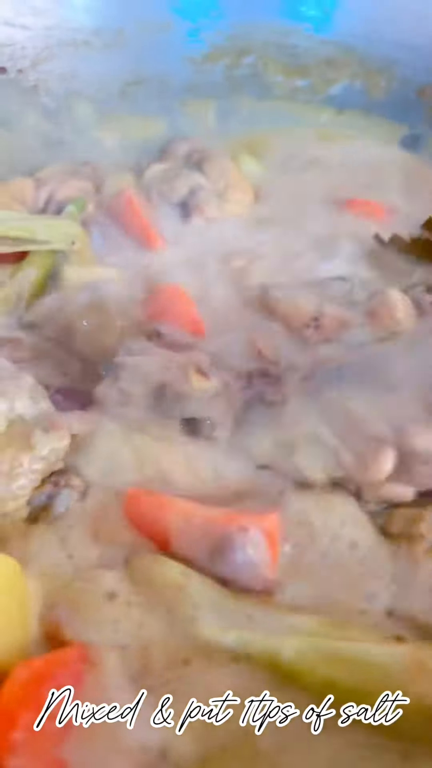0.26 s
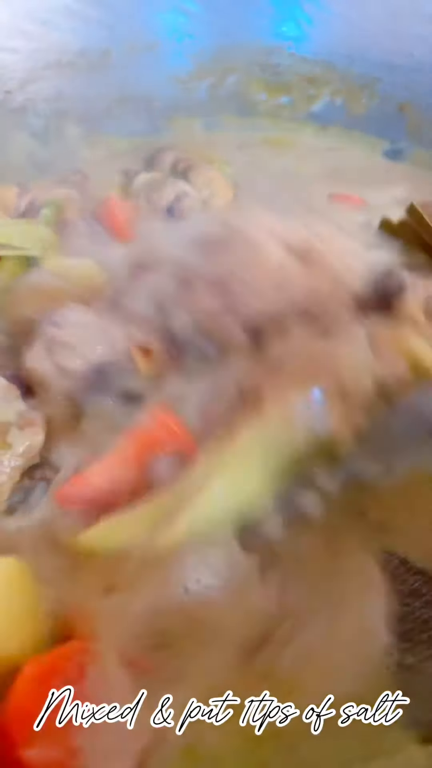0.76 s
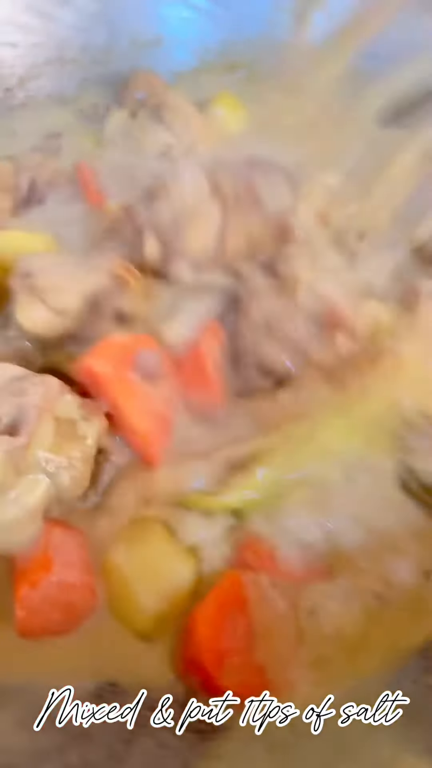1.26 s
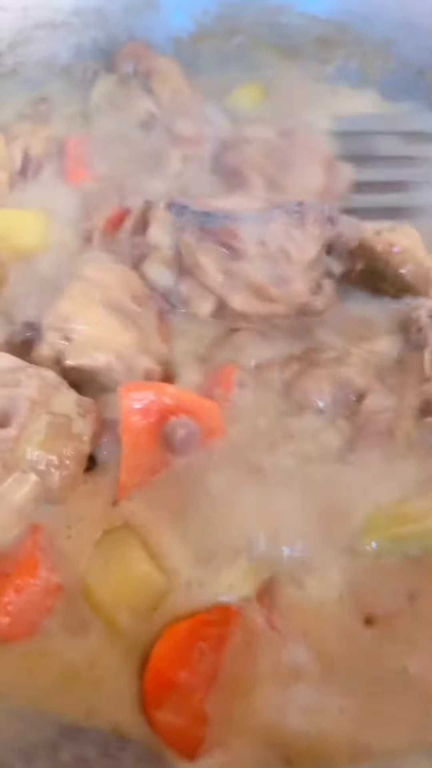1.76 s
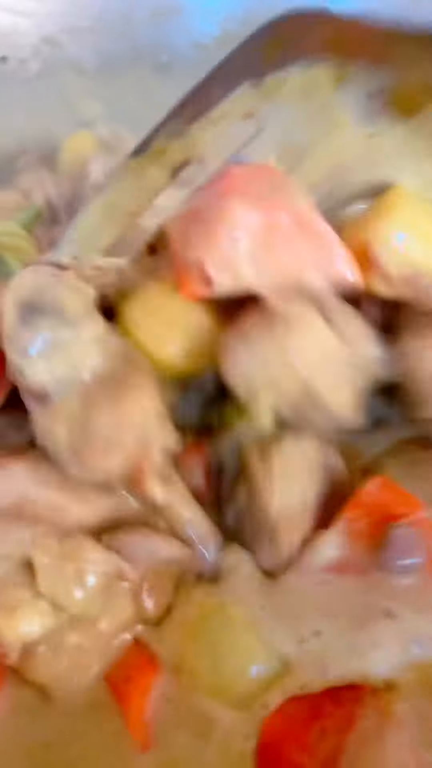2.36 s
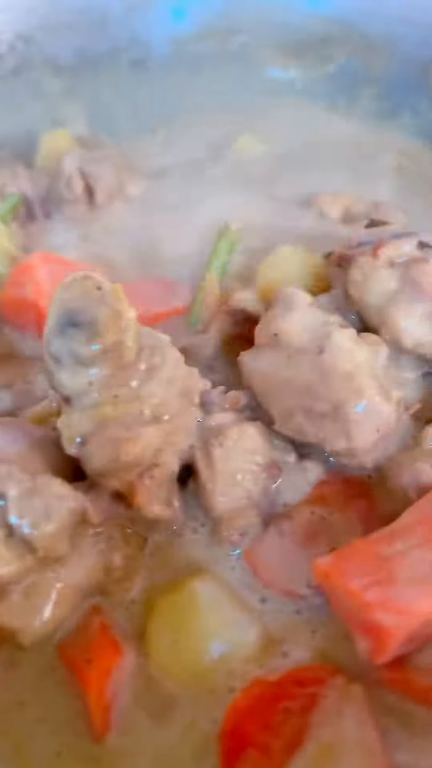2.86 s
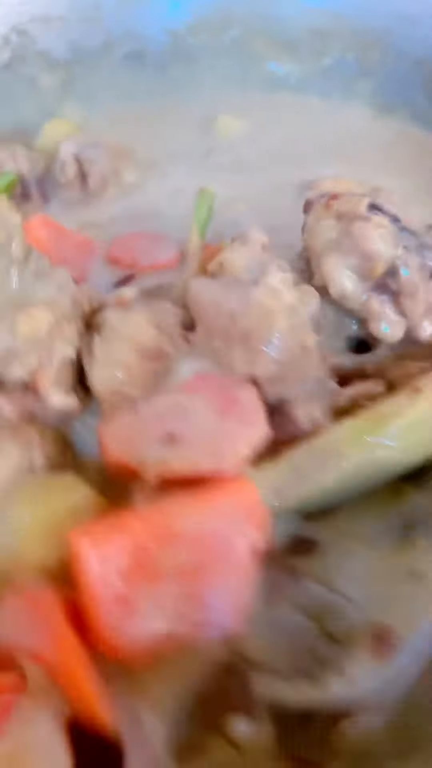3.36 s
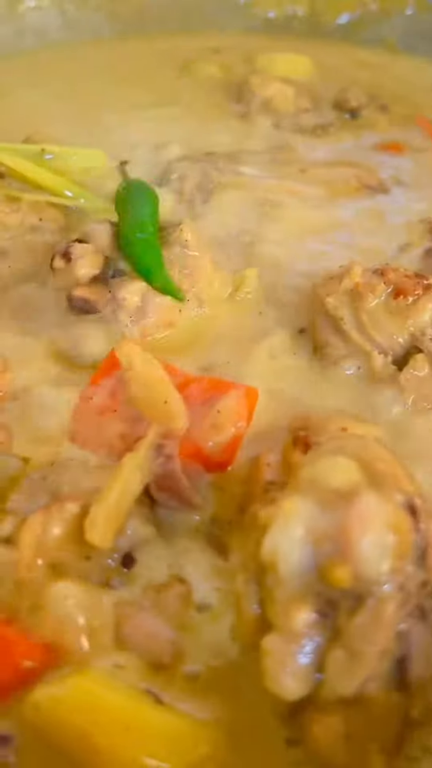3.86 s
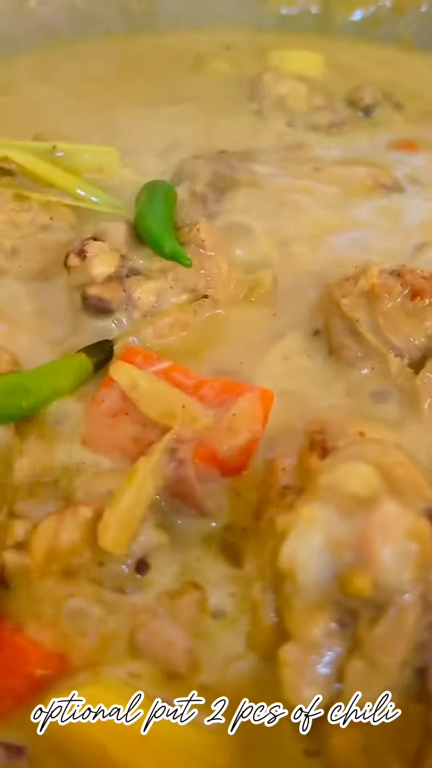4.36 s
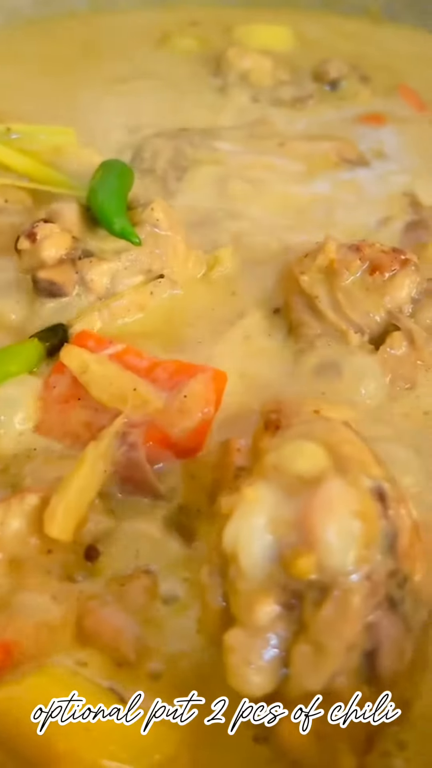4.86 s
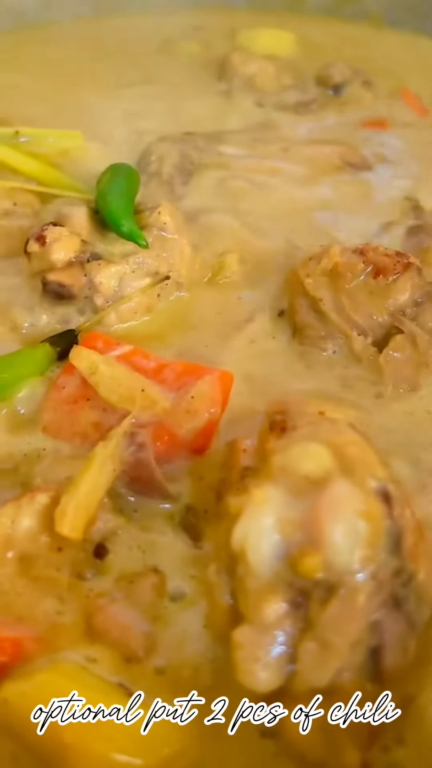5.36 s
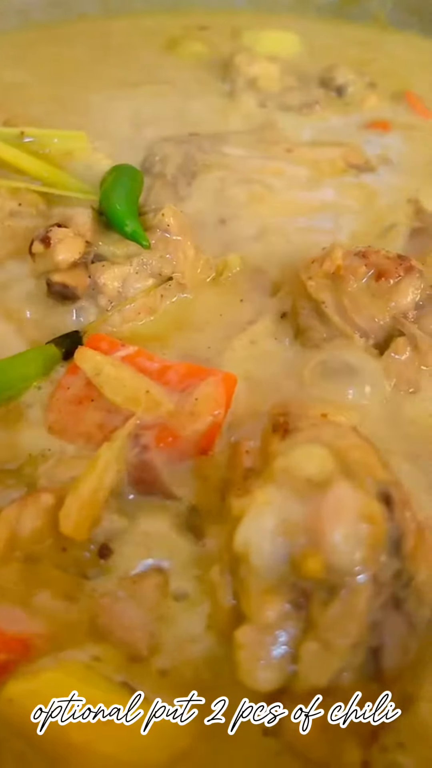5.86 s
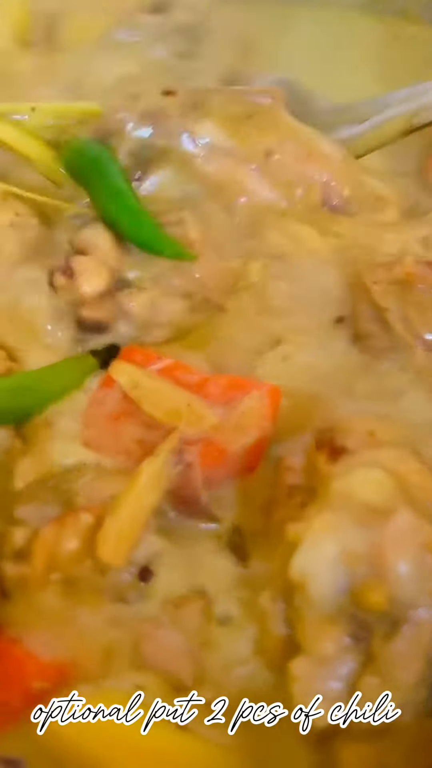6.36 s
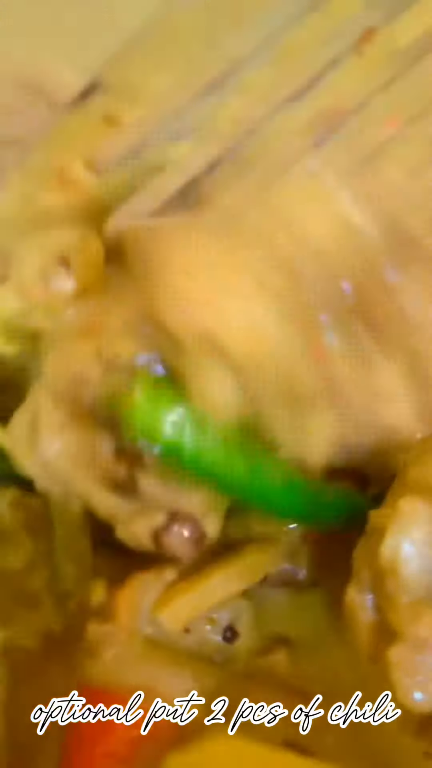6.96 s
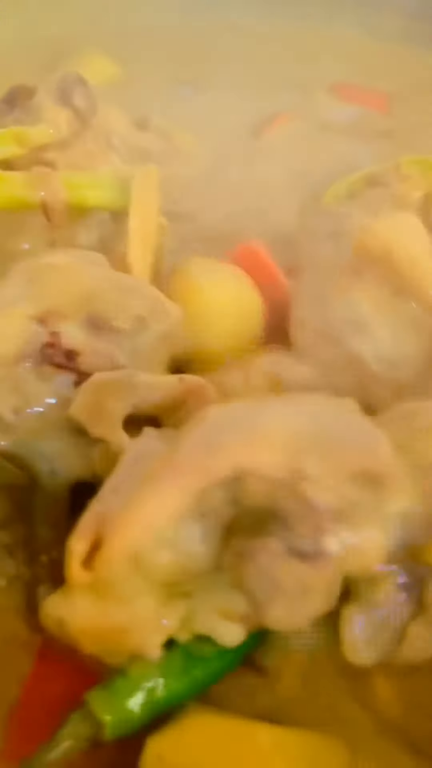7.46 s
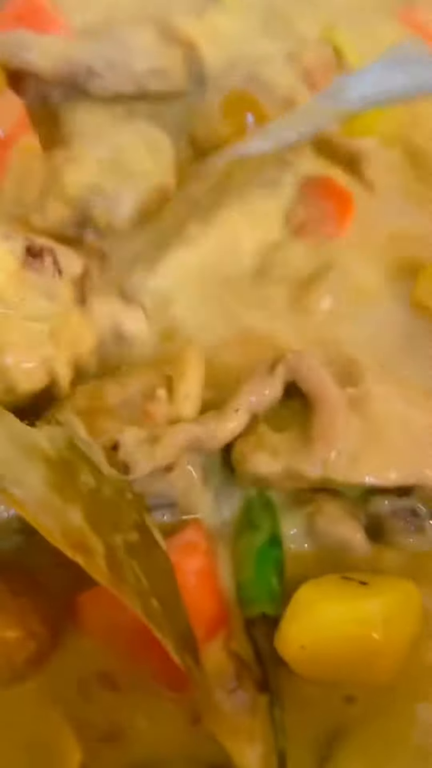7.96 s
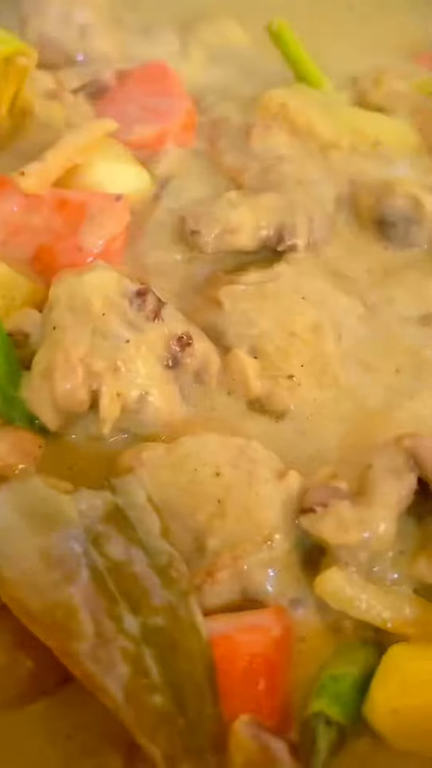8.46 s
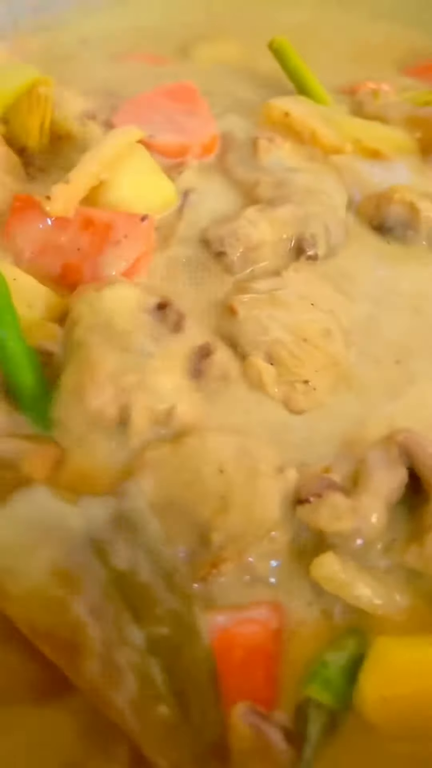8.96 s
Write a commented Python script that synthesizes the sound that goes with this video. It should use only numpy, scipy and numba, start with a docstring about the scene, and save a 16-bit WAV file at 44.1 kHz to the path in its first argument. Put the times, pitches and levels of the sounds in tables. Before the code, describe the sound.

Close to the microphone, thick sauce simmers in a metal pot in a small, reflective kitchen. A slotted steel spatula knocks and judders along the pot early on, with harder single blows afterwards. A dry click and a wet squelch lead into a brighter stretch of mostly popping bubbles. Then the spatula returns, loud bubbles burst, and knocks and scrapes continue to the end over a low hum.

```python
"""Thick curry simmers in a metal pot in a small hard-walled kitchen, close to the microphone.
From 0.5 s a slotted steel spatula knocks and judders along the pot; single blows follow at 1.5 and 2.8 s.
A dry click at 3.3 s and a squelch lead, as the treble opens at 3.7 s, into a stretch mostly of popping bubbles.
The spatula returns at 6 s, louder bubbles burst near 7 s, and knocks and scrapes fill the rest.
Throughout, bubbles burst as short rising tones over noise sizzle and a low drone of hum, mains and rumble."""
import sys
import numpy as np
from scipy import signal
from scipy.fft import rfft, irfft
from scipy.io import wavfile
from scipy.ndimage import uniform_filter1d, map_coordinates
from numba import njit

SR = 44100
rng = np.random.default_rng(int(sys.argv[2]) if len(sys.argv) > 2 else 0)


def store_pcm(level_fs):
    """Save levels as 16-bit WAV."""
    pcm = np.round(np.clip(level_fs, -1, 1) * 32767).astype(np.int16)
    wavfile.write(sys.argv[1], SR, np.atleast_2d(pcm).T)


N = 405719
TIME = np.arange(N) / SR
RING_TIME = TIME[:SR // 4]

# low hum of the kitchen: (time [s], relative level [dB])
HUM_LEVEL = [(0.3, -43), (1.7, -42.5), (2.8, -37.5), (3.8, -46), (5.5, -43), (7.8, -44.5), (8.8, -39.5)]
# spectrum of the kitchen rumble: (frequency [Hz], gain [dB])
RUMBLE_COLOUR = [(20, -11.5), (34, -12.5), (45, -4.5), (70, 3), (102, 1), (135, -3.5), (200, -13.5),
                 (260, -14.5), (360, -11), (500, -24), (900, -24.5), (3000, -86.5)]
# spectrum of the pot's shudder on the stove: (frequency [Hz], gain [dB])
SHUDDER_COLOUR = [(30, -23), (70, 5), (110, 8), (170, -13.5), (280, -11), (450, -20.5), (1500, -64)]
# simmering sauce: (time [s], relative level [dB])
SIMMER_LEVEL = [(0.25, -53), (1.35, -54), (2.45, -52), (3.65, -51.5), (3.85, -57.5), (4.5, -56.5),
                (5.6, -54), (6.8, -53.5), (8.5, -60.5)]
# spectrum of the sizzle: (frequency [Hz], gain [dB])
SIZZLE_COLOUR = [(300, -2.5), (600, -24), (1000, 3.5), (2500, -1.5), (4500, -10), (7000, -9.5), (9000, -19),
                 (11500, -26), (15500, -17)]
# spectrum of all bubbles: (frequency [Hz], gain [dB])
BUBBLE_COLOUR = [(700, -1.5), (1500, -4.5), (3500, -4.5), (7000, -4.5), (9000, -5.5), (12000, -30)]
# three sizes of bubble: (bursts [per s], middle pitch [Hz], pitch spread [octaves],
# relative level [dB], middle length of ring [cycles])
BUBBLE_SIZES = [(55, 1150, 0.42, -3.5, 11), (59.7, 2800, 0.5, -1.5, 16), (16, 6700, 0.2, -0.5, 20)]
# a burst sets off its neighbours: (mean gap [s], change per step [dB])
FOLLOWERS = (0.013, -5)
# squelches in the sauce: (start [s], length [s], relative level [dB], middle pitch [Hz])
SQUELCHES = [(3.46, 0.42, -65, 4400), (6.895, 0.079, -71, 2360), (6.98, 0.22, -59.5, 1590)]
# loud bubble pops and one dry click: (time [s], relative level [dB], starting pitch [Hz],
# length of ring [cycles], snap [dB])
POPS = [(0.087, -41, 5070, 20, -3), (0.239, -42, 3560, 16, -11), (0.303, -36, 2850, 18, -14),
        (0.404, -38, 880, 14, -25), (1.135, -33, 4970, 22, -15), (1.205, -29, 3700, 11, -7),
        (1.237, -37, 5160, 10, -7), (1.314, -37, 6300, 16, -2), (2.161, -18, 3400, 12, -7.5),
        (2.300, -30, 2800, 24, -14), (2.329, -36, 5700, 18, -8), (2.574, -39.5, 6500, 14, 0),
        (2.709, -30, 8500, 28, -14), (3.312, -16, 3210, 3, -6), (3.514, -38.5, 5300, 24, -20),
        (3.666, -35, 4220, 26, -11), (3.748, -40, 5150, 22, -6), (3.778, -42, 6300, 20, -10),
        (3.802, -43, 6950, 18, -8), (3.964, -43, 6400, 18, -6), (4.020, -46, 3750, 14, -9),
        (4.038, -36, 3500, 20, -7), (4.069, -38, 845, 22, -32), (4.092, -44, 3680, 17, -5),
        (4.171, -46, 780, 17, -27), (4.213, -35, 2720, 23, -15), (4.305, -41, 5240, 18, -2),
        (4.372, -41, 3950, 17, -8), (4.555, -39, 2750, 18, -9), (4.593, -41, 4350, 18, -11),
        (4.621, -45, 7200, 22, -9), (4.633, -42, 1520, 23, -16), (4.812, -38, 1450, 26, -27),
        (4.827, -42, 4550, 18, -7), (5.063, -40, 7000, 18, -7), (5.072, -38, 990, 18, -16),
        (5.098, -40, 3930, 19, -12), (5.388, -37, 8100, 26, -14), (5.457, -39, 3970, 12, -17),
        (5.504, -37, 3400, 20, -22), (5.553, -51, 2230, 15, -12), (5.591, -45, 7600, 20, -8),
        (5.729, -36, 3300, 20, -12), (5.792, -40, 3750, 16, -12), (5.846, -36.5, 1900, 30, -20),
        (5.934, -46, 6760, 14, 0), (6.007, -34, 3630, 8.9, -6), (6.517, -38, 900, 18, -22),
        (6.619, -36, 3000, 14, -10), (6.658, -35, 7100, 12, -3), (6.678, -38, 890, 18, -29),
        (6.725, -35, 3480, 22, -16), (6.764, -33, 2810, 16, -6), (6.889, -26, 2300, 29, -19),
        (6.926, -27, 2470, 27, -5.5), (6.981, -39, 1140, 24, -27), (7.013, -31.5, 6360, 13, -3.5),
        (7.165, -41, 1000, 19, -19), (7.222, -35.5, 7850, 22, -17), (8.599, -35, 7000, 39, -13)]
# ring shared by pot and spatula: (frequency [Hz], relative level [dB], t60 [s])
POT_MODES = [(248.4, -6, 0.49), (341.7, -6, 0.27), (441, -8.5, 0.098), (643, -7.5, 0.46),
             (819, -5.5, 0.047), (883.5, 1, 0.14), (982.5, 0.5, 0.072), (1093, -5.5, 0.19),
             (1320, -10, 0.18), (1587, -2, 0.1), (1721, -2, 0.048), (1865, -2.5, 0.12), (2040, -5, 0.18),
             (2194, -4.5, 0.089), (2326, -6.5, 0.22), (2630, -7.5, 0.16), (2860, -3, 0.12),
             (3190, -5.5, 0.14), (3990, -3, 0.24), (4130, -14.5, 0.16), (4526, -3, 0.03),
             (5150, -3.5, 0.025), (6120, -7.5, 0.25), (7300, -11, 0.13), (7120, -7.5, 0.12),
             (7554, -13.5, 0.32)]
# pushes of the spatula along the pot: (start [s], length [s], relative level [dB],
# rise from start to end [dB], swell in the middle [dB], pot bottom [relative dB],
# blade edge [relative dB], blade resonance at start [Hz], at end [Hz], width [share of its pitch])
STROKES = [(0.557, 0.081, -35.5, -1, 2, -7.5, 3.5, 2257, 1797, 0.83),
           (0.655, 0.066, -37, 4.5, -0.5, -4, -2.5, 1725, 1560, 0.74),
           (0.718, 0.065, -30.5, -4, -1.5, -8.5, -5, 1590, 1385, 0.8),
           (0.816, 0.084, -29.5, 2, -2.5, -15, -7.5, 1370, 1113, 0.96),
           (0.945, 0.007, -29, -8.5, 7, -23, -9, 1040, 1030, 1.2),
           (1.498, 0.13, -39.5, -1, 5, -7, 3, 2096, 1710, 0.9),
           (1.658, 0.16, -46.5, -11, -2, -6, 1, 1360, 1484, 1.6),
           (1.769, 0.037, -41, 6, -2, -17, -1.5, 1520, 1610, 0.54),
           (1.841, 0.088, -48.5, 4, 1, -21, 3.5, 1700, 1860, 1.2),
           (1.928, 0.035, -41.5, -7.5, 2, -11, -2, 2460, 2570, 0.89),
           (2.828, 0.14, -46.5, -14, -4, -1, 5.5, 2400, 2220, 1.8),
           (2.965, 0.13, -23, 2, 1, -23.5, -4, 2070, 2694, 0.93),
           (5.147, 0.089, -54.5, 3.5, 3, -7, -4.5, 6600, 6350, 0.65),
           (5.2, 0.04, -49.5, 4, 1, -13, -7, 2500, 2120, 1.1),
           (6.074, 0.077, -44.5, -2, 2.5, -2.5, -2.5, 1080, 1110, 1.8),
           (6.145, 0.2, -42, -3, 0.5, -7, 1.5, 1750, 1680, 0.66),
           (6.39, 0.13, -54, -8, -5, -15, 2, 2310, 2010, 0.5),
           (7.426, 0.18, -38.5, 3, 2, -2.5, -1, 1374, 1355, 0.81),
           (7.569, 0.11, -31.5, -0.5, 0.5, -7.5, -7.5, 1377, 1250, 0.85),
           (7.681, 0.069, -28.5, -2, -2.5, -5.5, -9, 1344, 1174, 0.95),
           (7.764, 0.11, -36.5, 1, 0.5, -13, -9, 1295, 1173, 0.76),
           (7.984, 0.048, -45.5, 7, -3, -14, -6.5, 1070, 1090, 1.3),
           (8.034, 0.11, -36.5, 11, 10.5, -11.5, -5.5, 993, 1320, 0.96),
           (8.074, 0.065, -36, 8.5, 4, -26, -8, 2550, 2690, 0.64),
           (8.698, 0.11, -38.5, 0, 2, -5, -3.5, 1106, 883, 1.6),
           (8.821, 0.13, -33, -0.5, 4.5, -6.5, -5.5, 889, 836, 1.4),
           (8.967, 0.11, -37.5, -0.5, 2, 1, -3, 809, 1037, 1.2)]
# spectrum of the rubbed pot bottom: (frequency [Hz], gain [dB])
BOTTOM_COLOUR = [(90, -12), (170, 14.5), (250, 8), (340, 8.5), (440, 10), (530, -4.5), (660, -3), (900, -9),
                 (1300, -40), (3000, -79.5)]
# spectrum of the thin blade edge: (frequency [Hz], gain [dB])
EDGE_COLOUR = [(1700, -21.5), (3000, 12.5), (4200, 9.5), (5300, 4.5), (6800, 3.5), (8500, 2), (11000, -13),
               (15500, -7.5)]
# spatula lands on the pot: (time [s], relative level [dB], treble tilt [dB per octave], rattle time [s],
# most strongly struck pitch [Hz], its t60 [s], thud [dB], tick [dB])
KNOCKS = [(0.498, -21, 5.5, 0.0092, 6100, 0.092, 10, -13), (0.772, -26, -3.5, 0.0079, 1620, 0.04, -4, -30),
          (0.900, -21.5, -4, 0.012, 990, 0.058, -9, -37), (0.945, -19.5, -7, 0.0089, 910, 0.073, -15, -37),
          (1.463, -8.5, 3, 0.027, 1580, 0.053, 3.5, -32), (1.567, -15.5, 0.5, 0.0098, 3925, 0.3, 2, -15),
          (2.800, -8.5, 4.5, 0.016, 6137, 0.099, -1.5, -9.5),
          (2.867, -22.5, 0.5, 0.016, 4160, 0.05, 1, -14), (2.967, -16.5, 2, 0.02, 2010, 0.04, -8, -28),
          (3.056, -18.5, -3.5, 0.036, 2590, 0.08, -6.5, -33.5),
          (6.045, -15, 4.5, 0.01, 952, 0.042, 3, -8.5), (6.361, -26.5, 2.5, 0.017, 2880, 0.04, -4, -15),
          (7.395, -11.5, 4, 0.013, 6550, 0.038, 8.5, -14), (7.706, -21.5, -6, 0.0091, 1830, 0.08, -8, -44),
          (7.985, -35.5, -8, 0.013, 890, 0.06, -2, -21), (8.036, -29, -6, 0.021, 965, 0.06, -2, -31),
          (8.666, -14.5, -2.5, 0.011, 879, 0.1, -8, -25)]
# spectrum of the knocks: (frequency [Hz], gain [dB])
KNOCK_COLOUR = [(100, -4), (260, 10), (560, -0.5), (950, 3), (2000, 3), (4000, 3.5), (6500, 1), (8300, -2),
                (11000, -19.5), (15500, -23)]
# duller treble of the first seconds: (frequency [Hz], gain [dB])
DULL_COLOUR = [(4000, 0), (6500, 1), (7800, -6.5), (9200, -16), (11500, -10.5), (15000, -7)]


def undb(db):
    """Decibels to gain."""
    return 10 ** (np.asarray(db) / 20)


def unit(x):
    """Scale to rms 1."""
    return x / np.sqrt(np.mean(x ** 2))


def unit_energy(x):
    """Scale to energy 1."""
    return x / np.sqrt(np.sum(x ** 2))


def fade(t, t60):
    """Exponential decay, 60 dB down after t60."""
    return np.exp(-np.log(1000) * t / t60)


def level_curve(points):
    """Gain over time through (s, dB) points."""
    return undb(np.interp(TIME, *np.transpose(points)))


def convolve(x, response):
    """Pass a sound through an impulse response."""
    return signal.oaconvolve(x, response)[:len(x)]


def colour(x, points, tilt_db=0, size=4096):
    """Minimum-phase filter through (Hz, dB) points, tilted in dB per octave about 2 kHz."""
    octave = np.log2(np.maximum(np.fft.rfftfreq(size, 1 / SR), 1))
    hz, db = np.transpose(points)
    tilt = tilt_db * np.clip(octave - np.log2(2000), -1, 2)
    gain = undb(np.interp(octave, np.log2(hz), db) + tilt)
    # folding the cepstrum forward in time makes the filter causal
    cepstrum = irfft(np.log(gain))
    cepstrum[1:size // 2] *= 2
    cepstrum[size // 2 + 1:] = 0
    return convolve(x, irfft(np.exp(rfft(cepstrum))))


@njit
def band_pass(x, hz, width):
    """State-variable band-pass with a moving centre; width as a share of the centre."""
    y, band, low = np.empty(len(x)), 0., 0.
    for i in range(len(x)):
        g = np.tan(np.pi * hz[i] / SR)
        v = (band + g * (x[i] - low)) / (1 + g * (g + width))
        band, low, y[i] = 2 * v - band, low + 2 * g * v, width * v
    return y


def walk(rate):
    """Smooth random wander with a spread of 1, from random values drawn rate times a second."""
    k = max(int(SR / rate), 1)
    steps = np.repeat(rng.standard_normal(N // k + 1), k)
    return unit(uniform_filter1d(uniform_filter1d(steps, k), k)[:N])


def add(track, s, sound):
    """Mix a sound into the track at time s."""
    i = int(np.clip(s * SR, 0, N - 1))
    track[i:i + len(sound)] += sound[:N - i]


def scatter(t60):
    """A dense decay with nearly the same strength at every frequency."""
    t = TIME[:SR // 4 if t60 < .25 else SR // 2]
    spectrum = rfft(rng.standard_normal(len(t)) * fade(t, t60))
    flat = irfft(spectrum / np.abs(spectrum), len(t))
    return unit_energy(flat * fade(t, 4 * t60))


def drone(hum_hz=46.0, hum_db=-3, rumble_db=-48, mains_hz=101, mains_db=-56):
    """A wavering fan-like hum and a weak mains tone in a low, steady rumble."""
    hum = np.sin(2 * np.pi * np.cumsum(hum_hz + 1.54 * walk(14)) / SR)
    hum = unit(hum * (1 + 0.5 * np.tanh(walk(5))))
    mains = unit(np.sin(2 * np.pi * mains_hz * TIME) * undb(3.3 * walk(2.6)))
    rumble = unit(colour(rng.standard_normal(N), RUMBLE_COLOUR))
    return undb(hum_db) * level_curve(HUM_LEVEL) * hum + undb(mains_db) * mains + undb(rumble_db) * rumble


def sway(x, depth_s=0.0001, per_s=70):
    """A quickly wandering delay that smears thin tones into noise."""
    return map_coordinates(x, [(TIME + depth_s * walk(per_s)) * SR], mode="mirror")


def room(near, room_db=-10.0, room_t60=0.66):
    """Hard kitchen walls return a dense, swaying echo of the near sounds."""
    return undb(room_db) * sway(convolve(near, scatter(room_t60)))


def shudder(spatula, shudder_db=-11, settle_t60=0.66):
    """The heavy pot rumbles on the stove as hard as the spatula works it, and settles slowly."""
    memory = fade(TIME[:SR], settle_t60)
    effort = convolve(np.abs(spatula), memory / memory.sum())
    return undb(shudder_db) * effort * unit(colour(rng.standard_normal(N), SHUDDER_COLOUR))


def bubble(hz, cycles, snap_db, glide=0.29, snap_t60=0.014, snap_cycles=1.2, open_share=0.04):
    """The skin snaps with a short wet rasp, and the cavity opens and rings briefly, rising in pitch."""
    t60 = cycles / hz
    t = TIME[:int(max(t60, snap_t60) * SR)]
    ring = np.sin(2 * np.pi * hz * (t + glide * t ** 2 / (2 * t60)))
    # multiplied by the ring, the rasp spreads around its pitch, wider for fewer snap cycles
    rasp = unit(uniform_filter1d(rng.standard_normal(len(t)), max(int(snap_cycles * SR / hz), 2)))
    opening = np.minimum(t / (open_share * t60), 1)
    return ring * (opening * fade(t, t60) + undb(snap_db) * rasp * fade(t, snap_t60))


def bursts(spread_db=2.5, snap_db=-16, most_followers=4):
    """Bubbles burst alone or in short runs of neighbours; most are weak and a few stand out."""
    out, (gap_s, step_db) = np.zeros(N), FOLLOWERS
    for per_s, middle_hz, octaves, db, cycles in BUBBLE_SIZES:
        for when, size, run in rng.random((int(per_s * N / SR), 3)):
            s = when * N / SR
            size_db = db - spread_db * np.log(max(size, .02))
            for k in range(1 + int(most_followers * run ** 2)):
                pitch, damping = np.clip(rng.standard_normal(2), -2, 2)
                hz = middle_hz * 2 ** (octaves * pitch)
                pop = bubble(hz, cycles * np.exp(.3 * damping), snap_db)
                add(out, s, undb(size_db + k * step_db) * pop)
                s += gap_s * rng.exponential()
    return out


def squelches(bubbles_per_s=810, reach_octaves=0.72, cycles=14, snap_db=-20):
    """The sauce lets go a swelling cloud of tiny bubbles."""
    out = np.zeros(N)
    for s, length, db, middle_hz in SQUELCHES:
        cloud = np.zeros(N)
        for when, pitch, size in rng.random((int(bubbles_per_s * length), 3)):
            hz = middle_hz * 2 ** (reach_octaves * (2 * pitch - 1))
            add(cloud, s + when * length, size * np.sin(np.pi * when) * bubble(hz, cycles, snap_db))
        out += undb(db) * unit_energy(cloud) * np.sqrt(length * SR)
    return out


def simmer(bed_db=-4.0, sizzle_db=-7.5, flicker_db=2.0, bed_wall_db=-4, single_wall_db=-6, wall_t60=0.057):
    """A random bed of bubbles, with single pops and squelches, echoes in the pot over a noise sizzle."""
    bed, singles = bursts(), squelches()
    for s, db, hz, cycles, snap_db in POPS:
        add(singles, s, undb(db) * bubble(hz, cycles, snap_db))
    boil, walls = level_curve(SIMMER_LEVEL), scatter(wall_t60)
    bed = unit(bed + undb(bed_wall_db) * convolve(bed, walls))
    singles = singles + undb(single_wall_db) * convolve(singles, walls)
    bubbles = colour(undb(bed_db) * boil * bed + singles, BUBBLE_COLOUR)
    sizzle = unit(colour(rng.standard_normal(N), SIZZLE_COLOUR))
    return bubbles + sizzle * undb(sizzle_db + flicker_db * walk(19)) * boil


def pot_ring(detune_share=0.004, spot_db=1.5):
    """The tuned modes of pot and spatula; each contact draws its own mode strengths and a slight detuning."""
    ring = np.zeros(len(RING_TIME))
    for hz, db, t60 in POT_MODES:
        favour, detune, phase = rng.standard_normal(3)
        tone = np.sin(2 * np.pi * (hz * (1 + detune_share * detune) * RING_TIME + phase))
        ring += undb(db + spot_db * favour) * unit_energy(tone * fade(RING_TIME, t60))
    return unit_energy(ring)


def contact(ring_db, dense_t60=0.068):
    """Each point of contact adds its own crowd of quickly damped modes, strong and weak, to the ring."""
    crowd = unit_energy(rng.standard_normal(len(RING_TIME)) * fade(RING_TIME, dense_t60))
    return unit_energy(undb(ring_db) * pot_ring() + crowd)


def blade_ring(t60, lowest_hz=560, spacing_hz=330, count=22):
    """The blade's bending modes, loosely evenly spaced and different for every stroke."""
    t = TIME[:SR // 8]
    hz = lowest_hz + spacing_hz * (np.arange(count) + rng.random(count))
    modes = np.sin(2 * np.pi * (hz[:, None] * t + rng.random((count, 1))))
    return unit_energy(modes.sum(axis=0) * fade(t, t60))


def stick_slip(slip_hz=420, jitter=.3, size_db=4.0, grit_db=-4, judder_db=1.5):
    """The steel catches and lets go at an uneven rate, with fine grit in between."""
    phase = np.cumsum(slip_hz * np.exp(.25 * walk(8) + jitter * walk(500))) / SR
    # one impulse of random size for every whole cycle
    slips = np.diff(np.floor(phase), prepend=0) * undb(size_db * rng.standard_normal(N))
    grit = undb(grit_db) * rng.standard_normal(N)
    return (unit(slips - slips.mean()) + grit) * undb(judder_db * walk(55))


def scrapes(bottom_db=-1.5, edge_db=-1.5, glide=0.202, sliding_db=-2, sliding_t60=0.071,
            pressed_ring_db=-8, attack_s=0.0057, release_t60=0.22, edge_db_per_octave=3.5):
    """Friction drives the pot bottom, flexing blade and thin edge; each push bites, swells and dies away."""
    friction, out = stick_slip(), np.zeros(N)
    # a small random wobble makes the blade's modes glide unevenly
    wobble = np.exp(.016 * walk(70))
    for s, length, db, rise_db, swell_db, on_bottom_db, on_edge_db, start_hz, end_hz, flex_width in STROKES:
        span = slice(int(s * SR), int((s + length + release_t60) * SR))
        t = TIME[span] - TIME[span][0]
        progress = np.minimum(t / length, 1)
        bite = np.minimum(t / attack_s, 1)
        release = fade(np.maximum(t - length, 0), release_t60)
        pressure = bite * undb(db + rise_db * (progress - .5)) * release
        swell = undb(swell_db * np.sin(np.pi * progress) ** 2)
        hz = start_hz * (end_hz / start_hz) ** progress
        bend = hz / np.sqrt(start_hz * end_hz)
        # uneven playback speed makes the blade's modes glide
        blade = convolve(friction[span], blade_ring(sliding_t60))
        gliding = map_coordinates(blade, [np.cumsum(bend ** glide * wobble[span])], mode="mirror")
        # the pot rings less while the blade presses on it
        rubbed = convolve(friction[span], contact(pressed_ring_db)) + undb(sliding_db) * gliding
        resonance = band_pass(band_pass(rubbed, hz, flex_width), hz, flex_width)
        flex = unit(resonance / np.sqrt(hz))
        bottom = unit(colour(rubbed, BOTTOM_COLOUR)) * undb(bottom_db + on_bottom_db)
        # the edge dulls as the blade digs in and its resonance sinks
        dulling_db = edge_db_per_octave * np.log2(bend)
        edge = unit(colour(rubbed, EDGE_COLOUR)) * undb(edge_db + on_edge_db + dulling_db)
        out[span] += pressure * swell * (flex + bottom + edge)
    return out


def knocks(gain_db=19.5, first_touch=0.48, struck_db=-9, ring_db=-6, tick_t60=0.018):
    """The blade lands with a bright tick and rattles against the metal, favouring one pitch at each spot."""
    out = np.zeros(N)
    for s, db, tilt_db, rattle_s, hz, struck_t60, thud_db, tick_db in KNOCKS:
        bounces = rng.standard_normal(len(RING_TIME))
        # uneven bounces die away under a bell-shaped envelope
        force = unit_energy(bounces * np.abs(bounces) * np.exp(-(RING_TIME / rattle_s) ** 2))
        force[0] += first_touch
        body = colour(convolve(force, contact(ring_db)), KNOCK_COLOUR, tilt_db)
        body = unit_energy(colour(body, [(400, thud_db), (700, 0)]))
        tone = np.sin(2 * np.pi * hz * RING_TIME) * fade(RING_TIME, struck_t60)
        struck = unit_energy(convolve(force, tone))
        tick = scatter(tick_t60)
        knock = body + undb(struck_db) * struck + undb(tick_db) * tick
        add(out, s, undb(db + gain_db) * knock)
    return out


def scene():
    """Spatula and sauce close by, with the echo of the kitchen, the shuddering pot and the drone."""
    spatula = knocks() + scrapes()
    near = spatula + simmer()
    return (near + room(near) + shudder(spatula) + drone())[None]


def record(dry, dull_until_s=3.74, top_hz=16000):
    """One microphone channel: the top is duller for the first seconds, and cut off steeply throughout."""
    sound = np.where(TIME < dull_until_s, colour(dry[0], DULL_COLOUR), dry[0])
    steep_cut = signal.ellip(8, .2, 70, top_hz, fs=SR, output="sos")
    return signal.sosfilt(steep_cut, sound)[None]


dry = scene()
out = record(dry)
store_pcm(out)
```